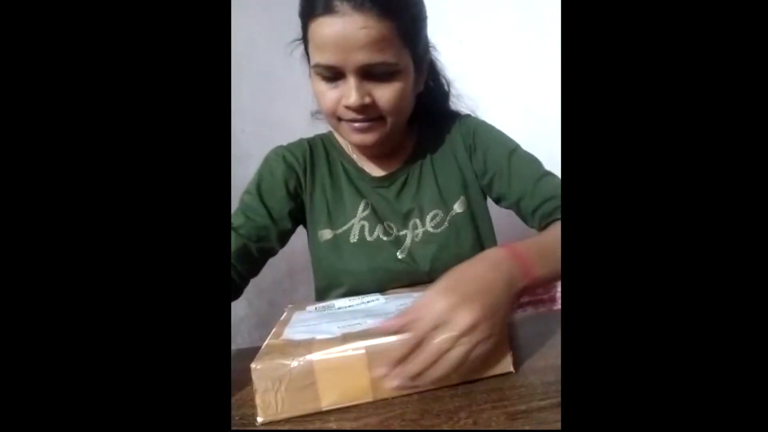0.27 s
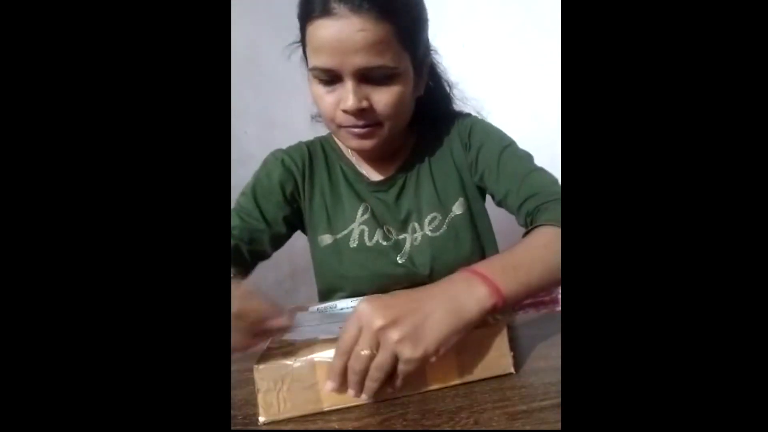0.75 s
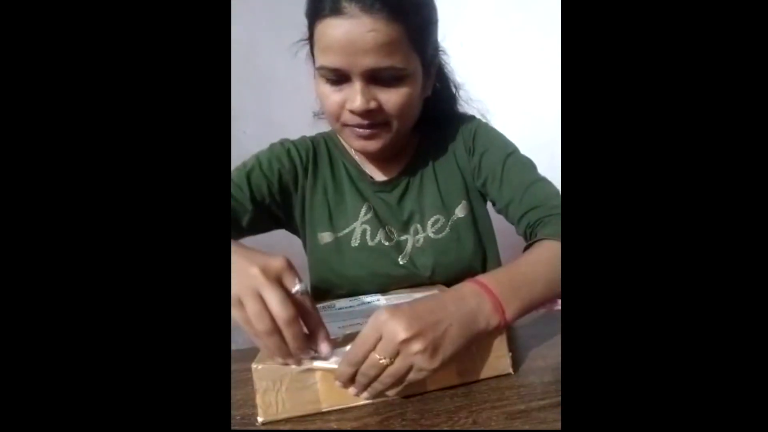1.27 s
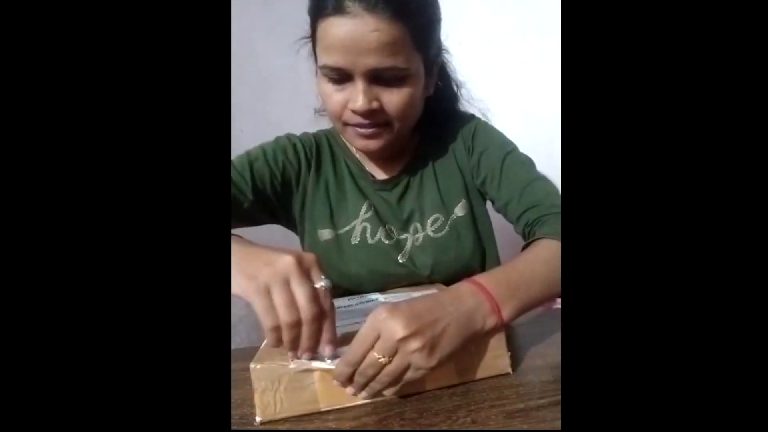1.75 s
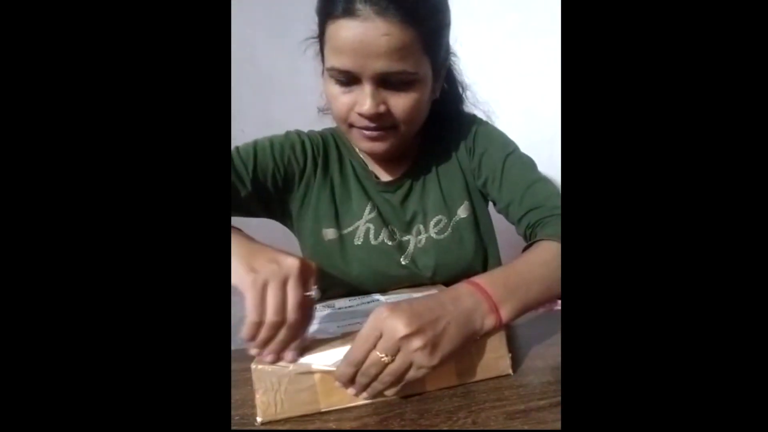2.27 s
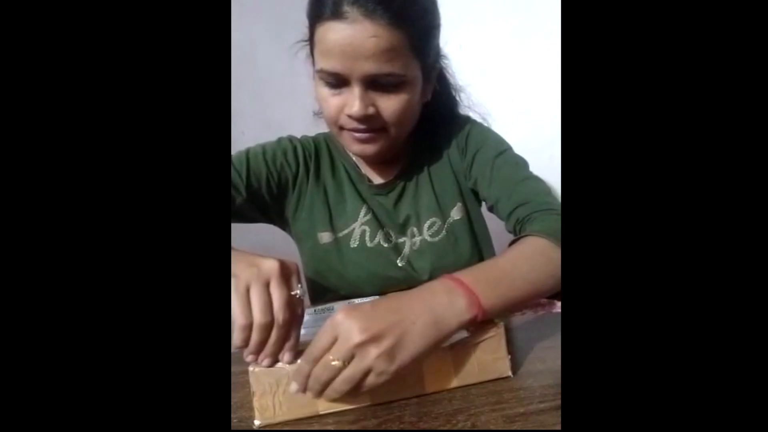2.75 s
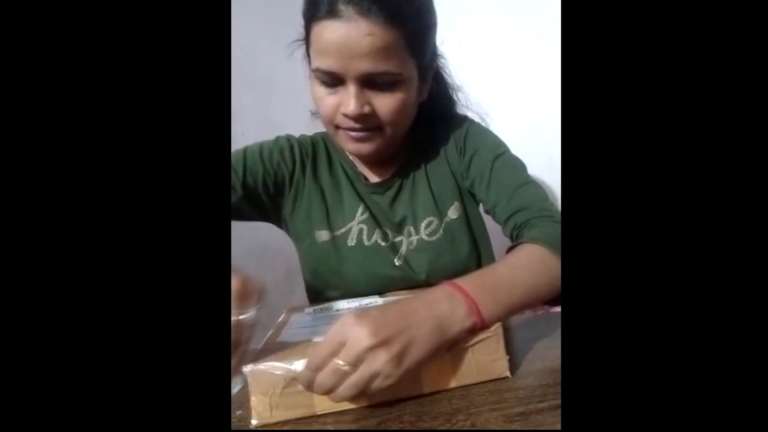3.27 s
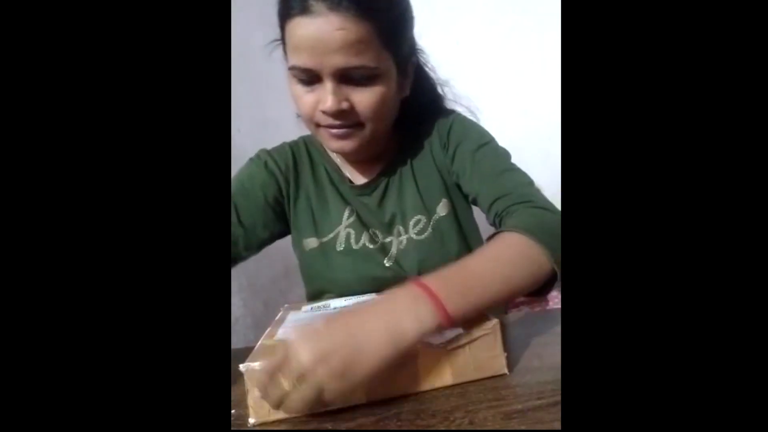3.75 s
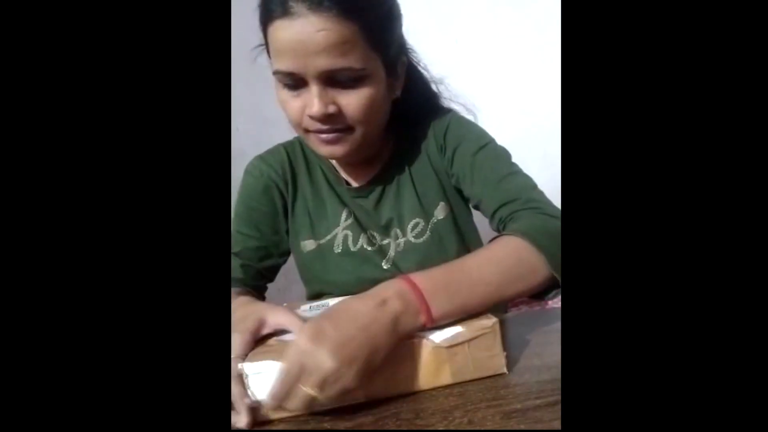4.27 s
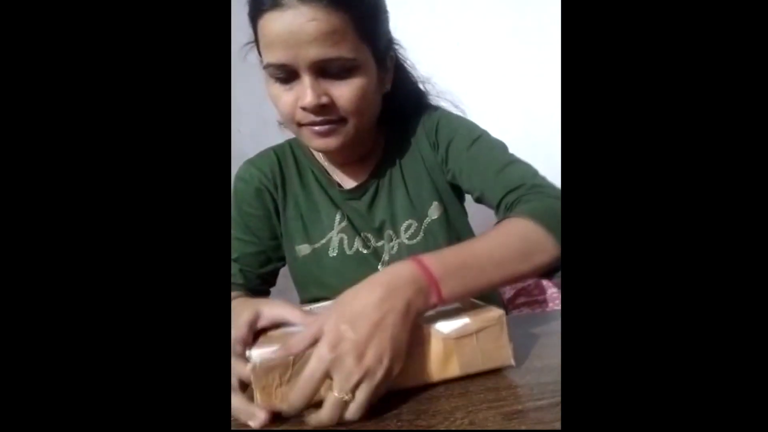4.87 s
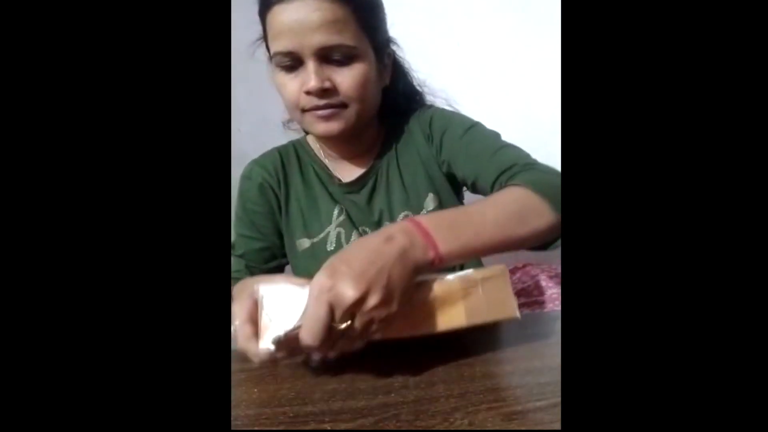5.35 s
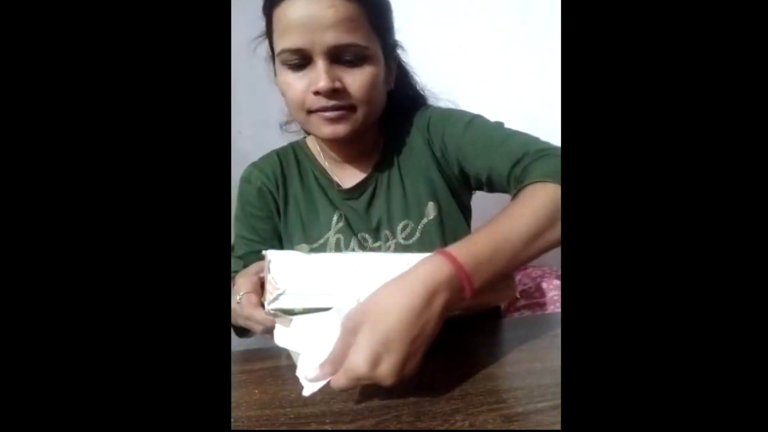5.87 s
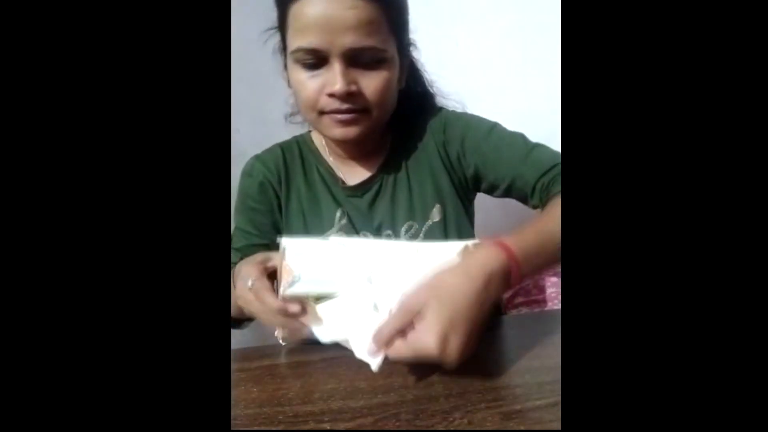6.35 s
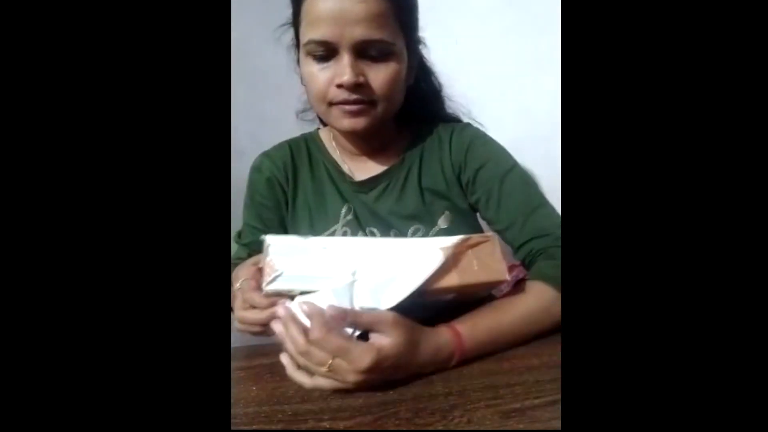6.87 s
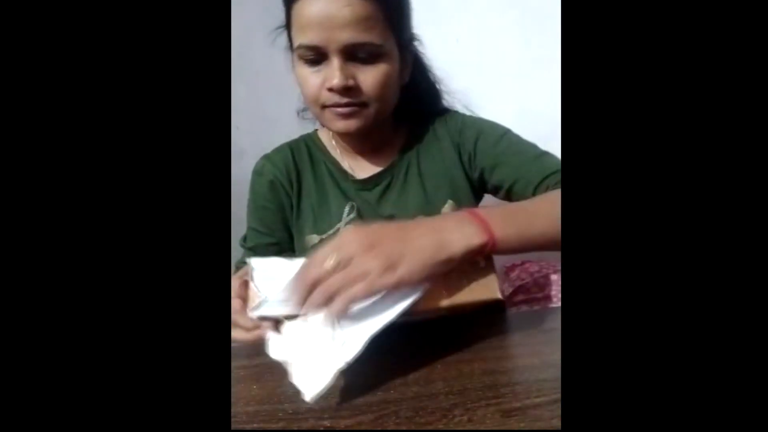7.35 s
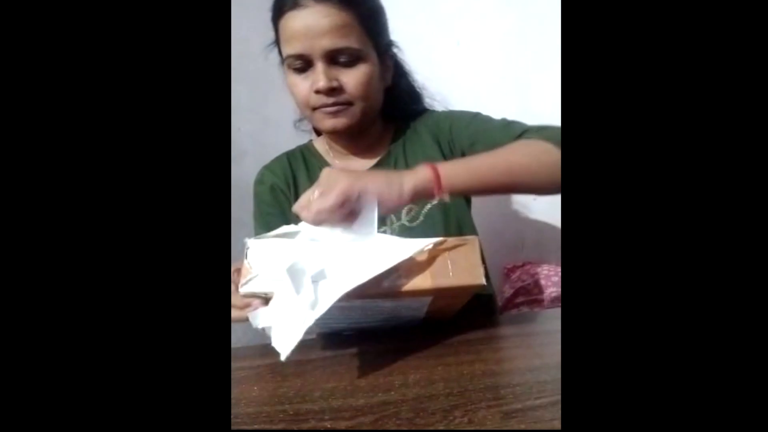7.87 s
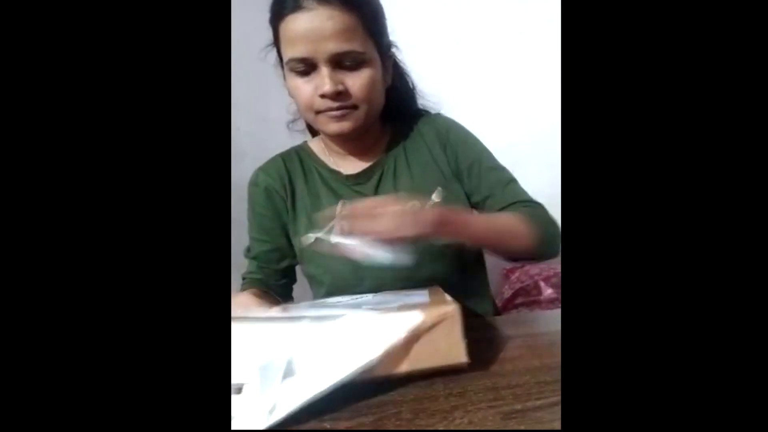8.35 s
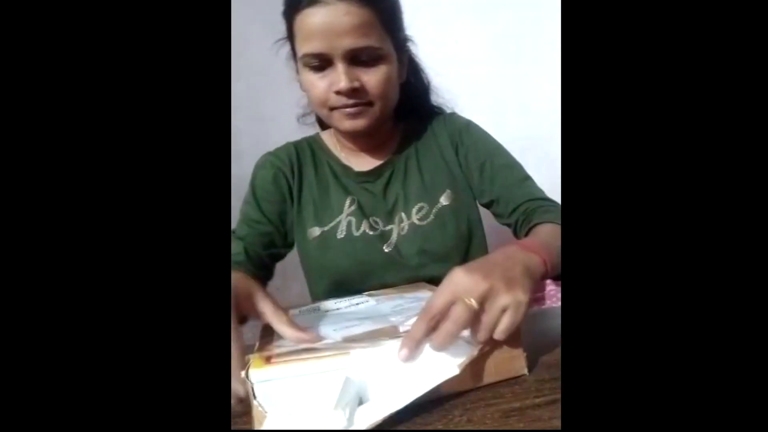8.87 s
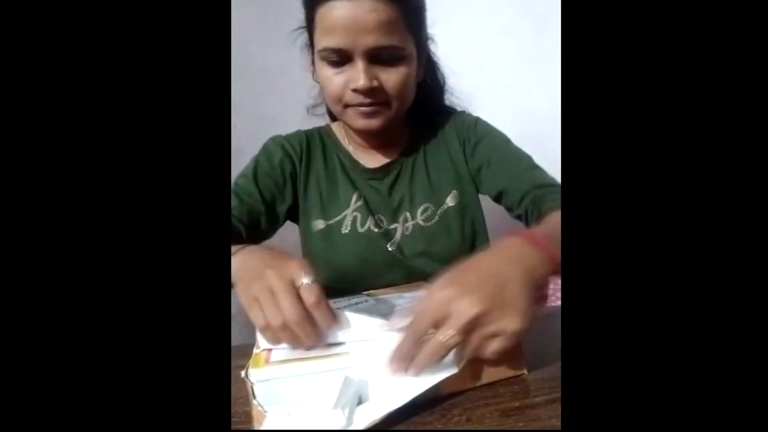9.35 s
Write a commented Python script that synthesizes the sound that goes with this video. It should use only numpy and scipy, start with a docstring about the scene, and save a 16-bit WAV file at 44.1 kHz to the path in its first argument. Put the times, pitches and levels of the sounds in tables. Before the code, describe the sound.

Close to a phone microphone in a small room, tape and paper wrapping crackle and snap as they are pulled from a cardboard box. The box walls pop and rustle, and it knocks now and then on a wooden table. Small tears give way to several loud rips, the hardest slightly distorted, then a heavy bump and softer crinkling. A low background rumble and hiss stay underneath.

```python
"""A soft bump and sharp snaps come first, as hands pick at the taped paper round a cardboard box,
then tear and crumple it close to a phone. Tape and fibres break over a bed of fine crinkle;
the box walls buckle with dry pops, and bumps ring the modes of the wooden table beneath.
A small hard room answers over a low murmur and hiss, and the loudest rips clip and distort."""
import sys
import numpy as np
from scipy import signal
from scipy.fft import rfft, irfft, next_fast_len
from scipy.io import wavfile
from scipy.ndimage import map_coordinates

SR = 44100
rng = np.random.default_rng(int(sys.argv[2]) if len(sys.argv) > 2 else 0)


def int16_out(signal):
    """Quantize to a 16-bit WAV file."""
    q = np.round(np.clip(np.atleast_2d(signal).T, -1, 1) * 32767)
    wavfile.write(sys.argv[1], SR, q.astype(np.int16))


N = 423801

# Spectrum of breaking paper. Each row: frequency in Hz, relative spectral density in dB.
PAPER_SPECTRUM = [(1470, -13), (2500, -3.5), (2910, -6.5), (3190, -7), (4510, 1.5), (5570, -2.5), (6140, 1),
                  (8930, 2.5), (12000, -3.5), (15600, -22), (22000, -120)]


def amp(db):
    """Decibels as an amplitude ratio."""
    return 10 ** (np.asarray(db) / 20)


def unit(x):
    """Normalisation to rms 1."""
    return x / np.sqrt(np.mean(x ** 2) + 1e-20)


def along(points, hz):
    """Interpolation of (Hz, value) points on a log frequency axis."""
    knots_hz, values = np.transpose(points)
    return np.interp(np.log(hz + 1), np.log(knots_hz + 1), values)


def curves(rows):
    """Linear interpolation, one value a sample, of each column after the time."""
    times, *columns = np.transpose(rows)
    return [np.interp(np.arange(N) / SR, times, column) for column in columns]


def wobble(rate):
    """Slow random modulation: a spline through rate knots a second."""
    return map_coordinates(rng.standard_normal(int(N * rate / SR) + 4), [np.arange(N) * rate / SR])


def filtered(x, response):
    """Zero-phase filtering: the spectrum times a function of frequency."""
    size = next_fast_len(N + 8192)
    return irfft(rfft(x, size) * response(np.fft.rfftfreq(size, 1 / SR)), size)[..., :N]


def coloured(x, spectrum):
    """Spectral shaping by (Hz, dB) points, at rms 1."""
    return unit(filtered(x, lambda hz: amp(along(spectrum, hz))))


def grains(per_s, spread_db, life_s, friction, clump_db):
    """Shot noise of tiny clumped breaks over friction; a sheet is an extended source, so ports differ."""
    hits = rng.random(N) < per_s / SR * amp(clump_db * wobble(25))
    sizes = hits * amp(spread_db * np.minimum(rng.exponential(1, N), 3))
    envelope = signal.lfilter([1], [1, -np.exp(-1 / (life_s * SR))], sizes)
    return (unit(envelope) + friction) * (rng.standard_normal(N) + 1.14 * rng.standard_normal((2, N)))


def click(hz, cycles, t):
    """A damped oscillator that swings inwards first and decays 60 dB in the given cycles."""
    return -np.sin(2 * np.pi * hz * t) * amp(-60 * t * hz / cycles) * (1 - np.exp(-t * hz / 0.45))


def burst(hz, spread, count, t60, t):
    """Superposition of short-lived modes, spread about one frequency on a log axis."""
    size, detune, phase = rng.normal(0, 1, (3, count, 1))
    ratio = np.exp(spread * (np.linspace(-1, 1, count)[:, None] + detune / count))
    modes = amp(2 * size) * np.sin(2 * np.pi * np.minimum(hz * ratio, SR / 3) * t + 1.18 * phase)
    return modes.sum(axis=0) / np.sqrt(count) * amp(-60 * t / t60) * (1 - np.exp(-t / 0.00026))


def background():
    """Noise floor: the low murmur of the house, partly coherent between the ports, and steady hiss."""
    # Two noise spectra. Each row: frequency in Hz, relative spectral density in dB.
    murmur_spectrum = [(21, -18), (35, -1.5), (103, -4), (183, -2), (216, -2.5), (316, -3), (351, -9.5),
                       (600, -22), (780, -46), (1320, -120)]
    hiss_spectrum = [(290, -36), (500, -7), (670, -26), (886, -6), (2340, -23), (3480, -16), (4490, -9),
                     (8960, 1), (12000, -12), (15600, -38), (22000, -120)]
    common, side = (coloured(amp(1.5 * wobble(12)) * rng.standard_normal(N), murmur_spectrum)
                    for _ in range(2))
    murmur = amp(-52.5) * np.array([common + 0.33 * side, common - 0.6 * side])
    return murmur + amp(-47.5) * coloured(rng.standard_normal((2, N)), hiss_spectrum)


def room(x, step_s=0.2):
    """Convolution with early reflections and a diffuse tail, drawn anew each step as things move."""
    # Reverberation time. Each row: frequency in Hz, time to decay 60 dB in seconds.
    decay_times = [(200, 0.25), (1000, 0.2), (5000, 0.2), (11000, 0.36)]
    out, block = np.zeros((2, N + 2 * SR)), round(step_s * SR)
    for i in range(0, N, block):
        hz, t, noise = signal.stft(rng.standard_normal((2, SR // 4)), SR, nperseg=256)
        tail = signal.istft(noise * amp(-60 * t / along(decay_times, hz)[:, None]), SR, nperseg=256)[1]
        response = np.pad(amp(-5.5) * tail / np.linalg.norm(tail[0]), ((0, 0), (200, 0)))
        echoes = amp(-14.5) * rng.standard_normal((2, 12))  # off table, box and hands
        response[[[0], [1]], rng.integers(6, 200, (2, 12))] = echoes
        wet = signal.fftconvolve(x[None, i:i + block], response, axes=1)
        out[:, i:i + wet.shape[1]] += wet
    return out[:, :N]


def ports(x):
    """Path difference: the nearer microphone port hears first. The left is always a little louder."""
    # Where the hands work. Each row: time in seconds, lead of the left port in ms.
    left_lead = [(0, 0.13), (4.8, 0.1), (5.4, 0.027), (6.8, 0.046), (7.2, 0.032), (7.6, -0.032),
                 (8.4, -0.048), (8.7, .11), (9.61, 0.13)]
    shift = curves(left_lead)[0] * SR / 2000  # half the lead to each side, in samples
    k = np.arange(N)
    left, right = map_coordinates(x[0], [k + shift]), map_coordinates(x[1], [k - shift])
    return amp([[1.1], [-1.1]]) * np.array([left, right])


def air_puff():
    """Near-field flow: the hardest rip throws air at the ports, two slow swings of pressure."""
    # Each row: start in seconds, level in dB, length in seconds.
    puffs = [(6.293, -17.5, 0.055)]
    out = np.zeros(N)
    for start, db, length in puffs:
        u = np.arange(round(length * SR)) / (length * SR)
        out[round(start * SR):][:len(u)] += amp(db) * np.sin(np.pi * u) * np.sin(4 * np.pi * u)
    return out


def table_bumps():
    """Modal ringing: each bump of the box excites the damped modes of the table top."""
    # Each row: start in seconds, relative level in dB, extra dB for the deep modes, for the high modes.
    bumps = [(0.035, -28.5, 0, 0), (0.334, -30, 8.5, -16), (0.511, -32.5, 3, 3.5), (3.327, -28, 0, 8),
             (4.315, -30, 5, -7), (5.46, -18.5, -9, -5), (5.608, -47, -4, -3), (5.827, -27, 4, 18),
             (6.306, -31, -13, 21.5), (8.324, -11.5, -14, 0), (8.435, -12.5, 0, -1), (8.448, -3, 8.5, 1),
             (8.693, -26.5, 6, 1.5), (9.044, -23, 10.5, 3), (9.373, -26, -3, 3.5)]
    # Each row: mode frequency in Hz, relative level in dB, time to decay 60 dB in seconds.
    modes = [(43.4, -11, 0.84), (86.7, -15.5, 0.52), (134.7, -4, 0.35), (154.2, 3, 0.17), (247, 5, 0.062),
             (307, -5.5, 0.15), (401, -1.5, 0.08), (478, -7, 0.086), (757, -5.5, 0.068), (1150, -3, 0.039)]
    hz, mode_db, t60 = np.transpose(modes)[:, :, None]
    out, t = np.zeros(N + SR), np.arange(SR // 2) / SR
    fade = np.cos(np.pi * t)
    for start, db, deep_db, high_db in bumps:
        size, detune = rng.normal(0, 1, (2, len(modes), 1))
        gain = amp(mode_db + deep_db * (hz < 100) + high_db * (hz > 280) + 2 * size - 60 * t / t60)
        onset = 1 - np.exp(-t * hz / 1.04)  # low modes swell slowly
        ring = gain * np.sin(2 * np.pi * hz * (1 + 0.035 * detune) * t) * onset
        out[round(start * SR):][:len(t)] += amp(db - 7) * ring.sum(axis=0) * fade
    return out[:N]


def box_pops():
    """Buckling or tapped cardboard rings as one heavily damped note with weaker neighbouring modes."""
    # Each row: time in seconds, relative level in dB, note in Hz.
    pops = [(0.0508, -20, 2120), (.7344, -19, 1780), (0.9106, -7, 2080), (.9986, -26, 1280),
            (1.1031, -14.5, 1180), (1.2984, -33, 1970), (1.312, -32, 1890), (1.4035, -33, 1420),
            (1.4344, -32, 1410), (1.9604, -23, 2270), (2.062, -4, 1990), (2.1765, -11.5, 2010),
            (2.1888, -18, 1580), (2.2467, -18, 1270), (2.2608, -9, 1720), (2.4282, -20, 1580),
            (2.472, -21.5, 1920), (2.487, -12.5, 1790), (2.6722, -21.5, 1280), (2.713, -21.5, 1480),
            (2.7407, -21, 1700), (2.751, -24.5, 1690), (2.793, -23, 1650), (3.0812, -7, 2160),
            (3.2299, -12, 1960), (3.2445, -9, 2300), (3.287, -16, 2200), (3.294, -9, 2410),
            (3.326, -13.5, 1780), (3.432, -27, 2310), (3.5365, -29, 1360), (3.8839, -27, 2300),
            (4.15, -21, 1550), (4.309, -28, 1440), (4.3249, -8, 1830), (4.436, -22, 1950),
            (4.4668, -12.5, 1560), (4.474, -14, 1920), (4.4866, -11, 1300), (4.5064, -6, 2050),
            (4.5968, -9, 1820), (4.885, -22.5, 684), (5.1612, -21.5, 1200), (5.2426, -19, 2060),
            (5.318, -27, 1530), (5.335, -17.5, 1540), (5.3594, -15, 1530), (5.4181, -18, 2250),
            (5.4737, -4, 1820), (5.5309, -25, 1590), (5.589, -18, 1420), (5.609, -17.5, 410),
            (5.61, -16.5, 970), (5.678, -14, 1710), (5.6924, -13, 1610), (5.701, -13, 1740),
            (5.734, -13, 1590), (5.8141, -10, 1190), (5.8431, -5, 1820), (5.8853, -8.5, 980),
            (6.295, -20, 2310), (6.316, -18.5, 400), (6.3465, -13, 454), (6.608, -19, 1890),
            (6.628, -8, 1660), (6.6367, -6.5, 1280), (6.6727, -17, 1380), (6.7012, -22, 1330),
            (7.3657, -21.5, 1250), (7.565, -26.5, 1540), (7.675, -23, 1900), (7.7844, -13, 2460),
            (7.798, -16.5, 1800), (7.832, -7, 2430), (7.862, -11, 2280), (7.887, -12, 2440),
            (7.9055, -5, 2420), (7.9238, -13, 2300), (7.9305, -5, 1530), (7.991, -23, 2050),
            (8.0459, -7.5, 1250), (8.077, -2.5, 1220), (8.085, -6, 1430), (8.107, -3.5, 1300),
            (8.1444, -17, 1400), (8.1616, -9, 2100), (8.261, -10, 1720), (8.3334, 8, 2160),
            (8.4362, -17, 765), (8.4428, -14, 1090), (8.6941, -32.5, 500), (9.05, -22, 1060),
            (9.3764, -17, 1230)]
    out, t = np.zeros(N + SR), np.arange(SR // 30) / SR
    for time, db, hz in pops:
        note = click(hz, 6.5, t) + 0.6 * burst(hz * 1.174, spread=0.721, count=6, t60=0.0073, t=t)
        out[round((time - 0.0004) * SR):][:len(t)] += amp(db + 9) * note
    return out[:N]


def handling_gains():
    """Incoherent sources add in power: tugs swell, hold and fade on top of the steady handling."""
    # Steady handling. Each row: time in seconds, paper crinkle in dB, box rustle in dB.
    handling = [(0, -48, -62), (.29, -57, -53), (1.04, -49, -49), (1.24, -63, -50.5), (1.6, -49, -48.5),
                (1.87, -38, -50.5), (2.14, -56, -48), (2.84, -36.5, -57), (3.29, -30.5, -39),
                (3.56, -39, -63), (4.28, -43, -51.5), (4.52, -22.5, -50), (4.72, -40, -51),
                (5.22, -35.5, -49), (5.62, -26.5, -37), (6.05, -26, -52), (6.5, -27.5, -47),
                (6.85, -38.5, -56), (7.1, -35, -42), (7.4, -46, -53), (8.03, -30.5, -55), (8.32, -19, -38),
                (8.5, -38, -66), (9.25, -38.5, -62), (9.61, -36.5, -34.5)]
    # Each row: time of full strength and hold in seconds, then crinkle, rustle and groan in dB.
    tugs = [(0.051, .03, -32, -41, -57), (0.872, 0.062, -40.5, -39, -53), (1.073, 0.053, -42, -47, -56),
            (1.4, 0.2, -38.5, -52, -52), (2.075, 0.051, -30.5, -62, -66), (2.208, 0.027, -23, -26.5, -64),
            (2.25, 0.025, -23, -53, -50), (2.467, 0.051, -29, -40, -68), (2.753, 0.077, -39, -43, -54),
            (3.223, 0.065, -32, -30.5, -46), (3.417, 0.057, -36.5, -49, -56), (3.983, 0.022, -37, -48, -65),
            (4.352, 0.049, -30, -40.5, -53), (4.466, 0.065, -37, -54, -58), (4.88, 0.06, -37, -67, -43.5),
            (5.465, 0.041, -19.5, -23.5, -35), (5.605, 0.055, -25, -34.5, -47),
            (5.696, 0.04, -19.5, -26, -33), (5.848, 0.029, -9.5, -23, -44), (6.24, 0.072, -24, -60, -65),
            (6.336, 0.053, -17.5, -38, -36), (6.563, 0.051, -46, -40, -48), (6.627, 0.027, -47, -40, -53),
            (6.732, 0.017, -33, -37, -48), (6.945, 0.061, -31, -39, -37.5), (7.175, 0.03, -34.5, -43, -48),
            (7.51, 0.082, -37.5, -46, -50), (7.64, 0.15, -36, -39, -46), (7.85, 0.11, -20.5, -29, -36.5),
            (8.103, 0.075, -40, -26, -39), (8.21, 0.072, -23.5, -39, -53),
            (8.331, 0.032, -13.5, -13.5, -27.5), (8.448, 0.017, -30, -49, -29.5),
            (8.72, 0.024, -31.5, -39.5, -46), (8.91, 0.034, -33.5, -47, -56),
            (9.02, 0.013, -34, -37, -43.5), (9.362, 0.036, -36, -43.5, -47.5),
            (9.6, .03, -29.5, -33.5, -35.5)]
    swell_db_per_s, fade_db_per_s, steady_groan_db = 196, 178, -55
    t = np.arange(N) / SR
    power = amp(curves(handling) + [np.full(N, steady_groan_db)]) ** 2
    for full, hold, *level_db in tugs:
        span = slice(max(round((full - 0.3) * SR), 0), round((full + hold + 0.4) * SR))
        swell_db = swell_db_per_s * np.maximum(full - t[span], 0)
        fade_db = fade_db_per_s * np.maximum(t[span] - full - hold, 0)
        power[:, span] += amp(np.array(level_db)[:, None] - swell_db - fade_db) ** 2
    return np.sqrt(power)


def crinkle():
    """Crackling noise: paper crinkles in the treble as the box walls rustle and, bending, groan."""
    # Two spectra of the box. Each row: frequency in Hz, relative spectral density in dB.
    rustle_spectrum = [(470, -32), (800, -2), (1180, -0.5), (1830, 0), (3200, -1), (4160, -13.5),
                       (7040, -120)]
    groan_spectrum = [(90, -24), (180, -4.5), (400, -0.5), (700, -9), (1100, -11.5), (2500, -120)]
    paper_gain, rustle_gain, groan_gain = handling_gains()
    paper = coloured(grains(500, spread_db=6, life_s=0.00026, friction=1, clump_db=6), PAPER_SPECTRUM)
    rustle = coloured(grains(500, spread_db=9, life_s=0.0041, friction=0.3, clump_db=1), rustle_spectrum)
    groan = grains(170, spread_db=5.5, life_s=0.0051, friction=0.32, clump_db=0.5)
    return paper_gain * paper + rustle_gain * rustle + groan_gain * coloured(groan, groan_spectrum)


def snaps():
    """Sudden release of tension: tape or fibres give a sharp crack, then fray away."""
    # Each row: time in seconds, relative level in dB, centre frequency in Hz.
    breaks = [(0.049, -15, 6800), (0.1129, -6.5, 7300), (.275, -24.5, 8200), (0.7, -16, 6640),
              (.8393, -29, 4780), (0.9107, -14.5, 5130), (1.0026, -24, 7160), (1.096, -16.5, 8900),
              (2.0617, 1.5, 7500), (2.069, -14, 7120), (2.0768, -14, 7500), (2.178, -1, 7460),
              (2.189, 3.5, 7650), (2.2577, -4.5, 7700), (2.2651, -6, 6140), (2.429, -9, 5360),
              (2.4859, -9.5, 5270), (2.795, -16, 7000), (2.977, -21, 7750), (3.0654, -27, 6430),
              (3.0812, -4.5, 4330), (3.15, -14, 7200), (3.181, -15, 6820), (3.2298, -1, 6100),
              (3.2408, -2, 6600), (3.281, -11, 7000), (3.289, -3, 6800), (3.299, -8, 6340),
              (3.3255, 2, 8900), (3.4311, -25, 7690), (3.4464, -27, 9020), (3.8838, -16, 7150),
              (4.155, -15, 7700), (4.3249, -1.5, 6840), (4.4358, -6, 8300), (4.4663, 1, 7960),
              (4.4757, 4.5, 8250), (4.4875, -4, 8260), (4.5061, 3.5, 7540), (4.588, -12.5, 6930),
              (4.5961, 3, 6860), (4.799, -21, 7970), (4.8568, -13, 8900), (5.196, -9.5, 7950),
              (5.2243, -5.5, 7300), (5.2423, -7, 4640), (5.359, -22, 5870), (5.376, -16, 6800),
              (5.4193, -20, 7820), (5.449, 5.5, 9000), (5.6674, -2.5, 6600), (5.7337, -4, 6040),
              (5.7417, 0.5, 6900), (5.798, -2, 5240), (5.816, 14, 4880), (5.976, -13, 8450),
              (6.077, -4, 9900), (6.103, -6.5, 7900), (6.179, 4, 10000), (6.2926, -1.5, 8600),
              (6.311, -1, 5840), (6.562, -13, 5170), (6.626, -9, 6070), (6.6354, -7, 7400),
              (6.9729, -15, 6250), (6.9965, -19, 7550), (7.1374, -14, 6730), (7.2155, -19, 8200),
              (7.6755, -8.5, 4300), (7.7285, -6.5, 6600), (7.746, -9.5, 5910), (7.7845, -12, 5500),
              (7.833, 7.5, 7030), (7.861, 2, 5300), (7.884, 0, 7000), (7.903, 3, 6350), (7.9291, 6, 6500),
              (8.046, -22, 4200), (8.0774, -15, 5330), (8.0828, -4, 7040), (8.208, -12, 7300),
              (8.2187, -6, 7600), (8.2265, -12, 7300), (8.3175, -7, 6800), (8.4513, -10.5, 7800),
              (9.0497, -18.5, 4670), (9.079, -19, 9200), (9.3758, -10.5, 6900), (9.5818, -15, 9300)]
    fray_db, fray_t60 = -18, 0.08
    out, t = np.zeros((2, N + SR)), np.arange(SR // 4) / SR
    fibres = grains(900, spread_db=7, life_s=0.00063, friction=0.17, clump_db=2.5)
    fray = np.pad(coloured(fibres, PAPER_SPECTRUM), ((0, 0), (0, SR)))
    for time, db, hz in breaks:
        i = round((time - 0.0003) * SR)
        cluster = burst(hz, spread=0.582, count=12, t60=0.0028, t=t[:400])
        out[:, i:i + 400] += amp(db + 11.5) * (click(hz, 10.3, t[:400]) + 0.56 * cluster)
        out[:, i:i + len(t)] += amp(db + fray_db - 60 * t / fray_t60) * fray[:, i:i + len(t)]
    return out[:, :N]


def rips():
    """Running fracture: a dense train of breaking fibres starts at once, holds and dies away."""
    # Each row: start in seconds, hold in seconds, level in dB.
    tears = [(0.45, 0.014, -37), (0.511, 0.0065, -33.5), (0.679, 0.045, -33.5), (0.89, 0.013, -27.5),
             (1.267, 0.093, -35.5), (1.81, 0.027, -36), (1.889, 0.11, -34.5), (2.061, 0.017, -16.5),
             (2.183, 0.0079, -16), (3.183, 0.0087, -32), (4.325, 0.013, -16), (4.589, .02, -12.5),
             (4.854, 0.067, -32.5), (5.441, 0.052, -13.5), (5.815, 0.064, -7), (6.31, 0.011, 0),
             (6.328, 0.043, -11.5), (6.549, 0.0069, -18.5), (6.931, 0.066, -27.5), (7.822, 0.1, -19),
             (8.322, 0.034, -6.5), (9.582, 0.023, -22)]
    release_t60 = 0.15
    pull, t = np.zeros(N + SR), np.arange(SR // 2) / SR
    for start, hold, db in tears:
        pull[round(start * SR):][:len(t)] += amp(db - 60 * np.maximum(t - hold, 0) / release_t60)
    fibres = grains(1200, spread_db=9, life_s=0.0011, friction=0.87, clump_db=5.5)
    return pull[:N] * coloured(fibres, PAPER_SPECTRUM)


def scene():
    """Superposition of direct sound, room sound and bumps that the table carries to both ports alike."""
    direct = crinkle() + rips() + snaps() + box_pops()
    bumps = table_bumps()
    radiated = 0.5 * filtered(bumps, lambda hz: hz ** 2 / (hz ** 2 + 250 ** 2))  # mainly upper modes
    airborne = direct.mean(axis=0) + radiated
    return ports(direct) + room(airborne) + bumps + air_puff() + background()


def record(dry):
    """Band limiting cuts the deepest rumble and top treble; peaks clip, with distortion up to 15.8 kHz."""
    def low_pass(hz, edge_hz):
        return np.clip((edge_hz - hz) / 300 + 0.5, 0, 1) ** 2

    band = filtered(dry, lambda hz: low_pass(hz, edge_hz=12193) * hz ** 2 / (hz ** 2 + 22 ** 2))
    return filtered(np.clip(band, -1, 1), lambda hz: low_pass(hz, edge_hz=15800))


dry = scene()
out = record(dry)
int16_out(out)
```